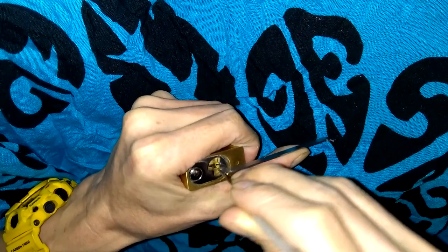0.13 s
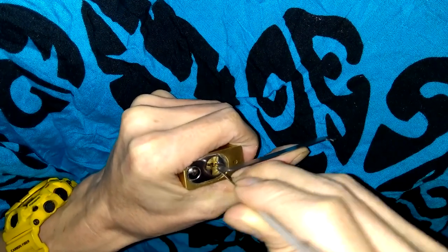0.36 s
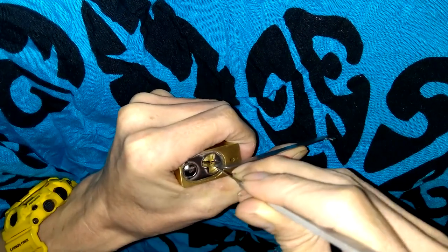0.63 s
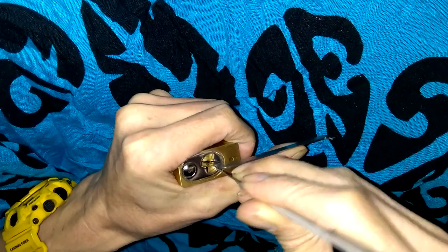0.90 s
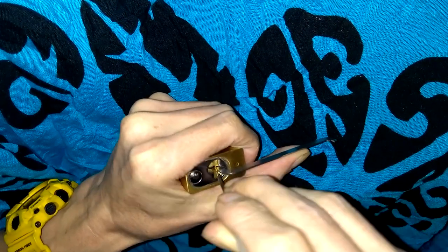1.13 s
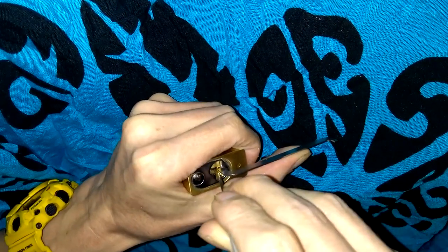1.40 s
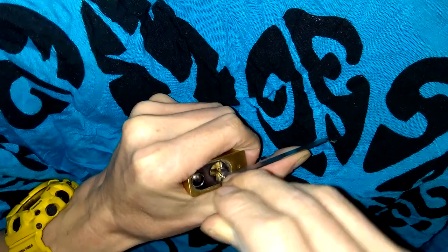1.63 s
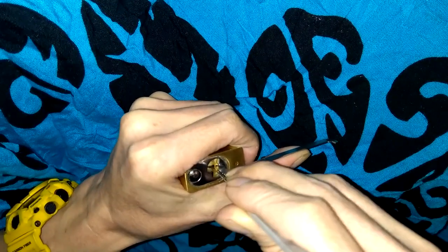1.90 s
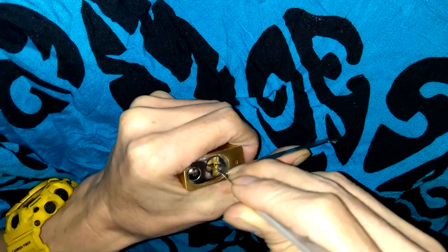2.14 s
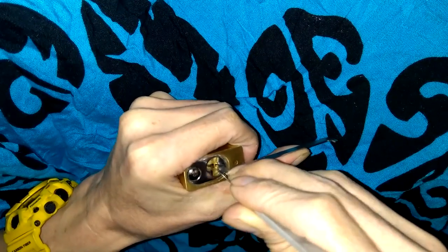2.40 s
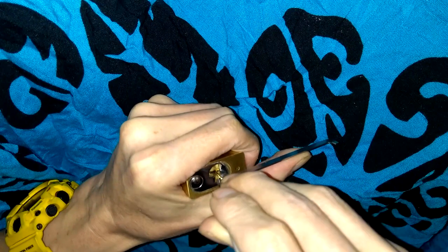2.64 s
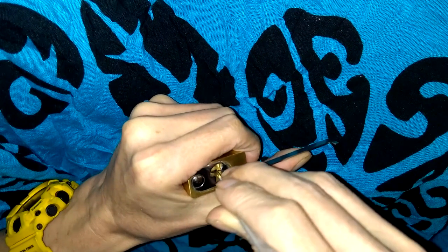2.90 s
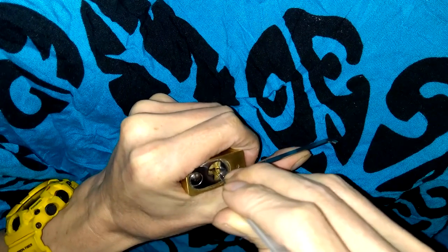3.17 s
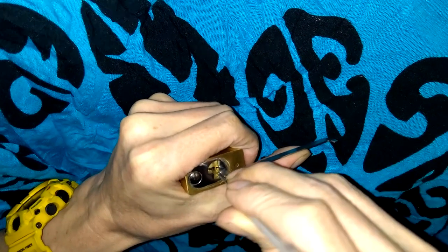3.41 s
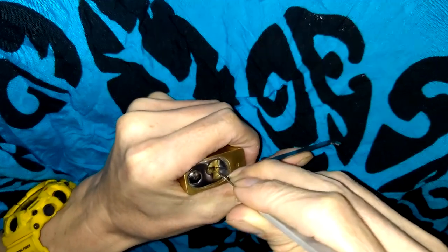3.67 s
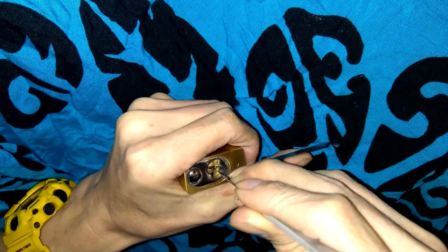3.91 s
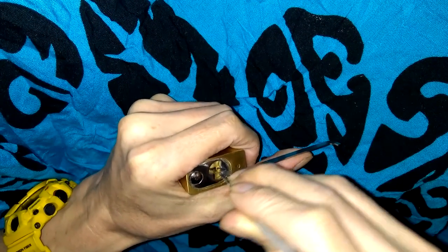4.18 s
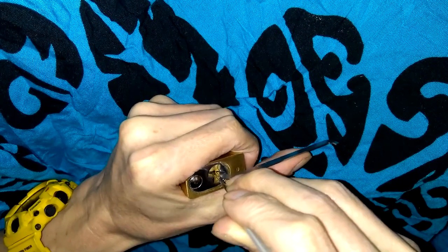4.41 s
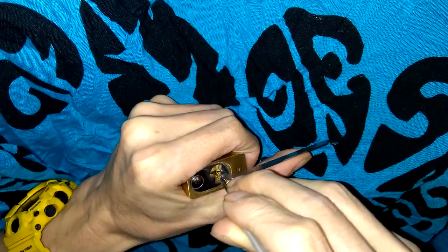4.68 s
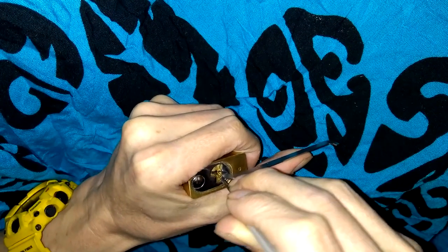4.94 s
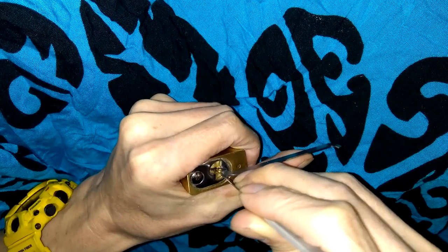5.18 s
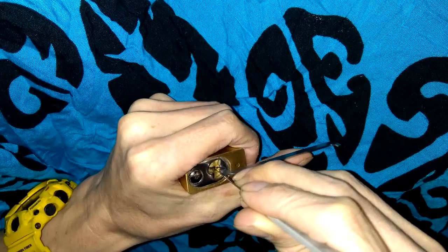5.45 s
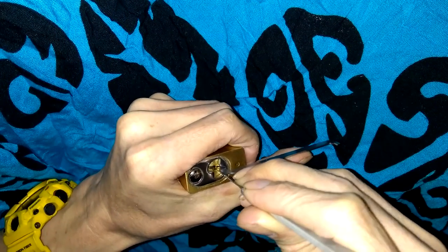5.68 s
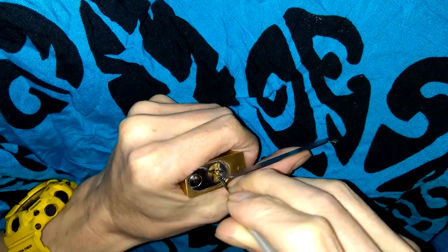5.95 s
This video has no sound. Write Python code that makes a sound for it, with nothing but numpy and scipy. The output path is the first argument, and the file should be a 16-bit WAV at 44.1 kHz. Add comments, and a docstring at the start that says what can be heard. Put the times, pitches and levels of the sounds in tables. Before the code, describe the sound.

Night insects chirr without pause, katydids rasp in uneven bursts, and a thin steel pick clicks faintly in a brass lock over distant traffic.

```python
"""A dense chorus of crickets on a warm night by a house wall: many ringing wings, each throbbing at its own pace.
A low trill pulses under them, a lone cricket sings short phrases and katydids rasp near and far in uneven clicks.
All the insects reach two microphones through one reflecting nook, built from parallel resonances and wall echoes.
Now and then a thin steel pick ticks on the pins of a brass padlock, setting short metal modes ringing.
Filtered noise makes a far insect hiss and, lowest of all, distant traffic with passing vehicles and a faint hum."""
import sys
import numpy as np
from scipy import signal
from scipy.fft import rfft, irfft
from scipy.io import wavfile
from scipy.ndimage import uniform_filter1d, map_coordinates

SR = 44100
rng = np.random.default_rng(int(sys.argv[2]) if len(sys.argv) > 2 else 0)


def wrap_up_sound(samples):
    """Save the sound to the file named by the first command line argument, as 16-bit audio."""
    columns = np.atleast_2d(samples).T
    # keep every value between -1 and 1, then stretch to whole-number steps
    tamed = np.clip(columns, -1, 1)
    steps = np.round(tamed * 32767).astype(np.int16)
    wavfile.write(sys.argv[1], SR, steps)


def field_ratio(decibels):
    """Amplitude ratio for a level in dB (20 dB per decade); scalars and array-likes work."""
    return 10 ** (np.asarray(decibels, dtype=float) / 20)


N = 267510
TIME = np.arange(N) / SR
HZ = np.maximum(np.arange(N // 2 + 1) * SR / N, 1)

# Swell of the main cricket band. Each row: time in seconds, level in dB.
CHORUS_SWELL = [(0, -34.5), (.4, -30.5), (.7, -35), (.95, -31), (1.15, -34), (1.26, -28), (1.6, -30.5),
                (2.05, -34.5), (2.45, -34.5), (3.1, -30.5), (3.35, -32.5), (3.58, -31), (3.85, -33.5),
                (4.4, -33), (5.15, -31.5), (5.65, -32.5), (5.9, -32.5), (6.07, -32)]
# Phrases of a lone cricket. Each row: start in seconds, end in seconds, level in dB.
LONE_PHRASES = [(0.26, 0.65, -49.5), (2.92, 3.27, -51.5), (5.73, 6.1, -49.5)]
# Wing strokes of the nearest katydid, in two calls.
# Each row: time in seconds, level in dB, wing ring in dB, treble in dB.
NEAR_STROKES = [(2.095, -38, -5, -5.5), (2.207, -31, 3, 0.5), (2.316, -32, 4, 3), (2.441, -31, 2, 2),
                (2.53, -51, -10, 12), (4.6, -47, -29, -28), (4.712, -34, -16, -8), (4.817, -30.5, 4, 2),
                (4.936, -28, 1.5, -1), (5.068, -28.5, 1, 1), (5.18, -48, -11, 5)]
# Calls of far katydids, each a run of even wing strokes.
# Each row: first stroke in seconds, last stroke in seconds, level in dB, offset at the first stroke in dB, treble in dB.
FAR_CALLS = [(0.047, 0.473, -40, 3, -40), (0.635, 1.306, -45, -0.5, -24), (1.436, 1.669, -33.5, -2.5, -8.5),
             (1.77, 1.987, -37.5, -5.5, -10), (2.848, 3.196, -47.5, 0, -4),
             (3.638, 4.185, -38.5, -5.5, -29), (5.45, 6.137, -40, -2, -8)]
# Colour of a wing rasp ahead of the nook. Each row: frequency in Hz, level in dB.
RASP_COLOUR = [(1300, -0.5), (1600, 1.5), (2000, -3), (2600, 4.5), (3600, 0.5), (4020, -0.5), (4300, 1),
               (5200, -4), (6300, 2.5), (8000, -2.5), (11000, -3), (13900, -2), (15100, -4), (15500, -40)]
# Resonances of the nook at each microphone.
# Each row: frequency in Hz, width in Hz, left level in dB, right level in dB, lead of the right in radians.
NOOK_RESONANCES = [(1620, 165, -15.0, -18.0, 0.91), (1980, 85, -5.5, -8.0, 1.5),
                   (2090, 60, -5.5, -7.5, -2.8), (2260, 130, -8.5, -9.5, -2.98),
                   (2465, 100, -5.0, -4.5, -2.95), (2670, 90, -7.5, -6.0, -3.1),
                   (2820, 40, -11.5, -3.0, -2.33), (2975, 70, -11.0, -19.0, -1.55),
                   (3190, 60, -7.0, 1.5, 1.72), (3340, 35, -2.5, 4.5, 0.77), (3650, 70, -2.5, 2.0, 0.49),
                   (3855, 100, -12.5, -9.5, 0.01), (4265, 210, -14.5, -12.0, 2.14),
                   (4670, 140, -12.0, -7.0, 2.7), (4935, 55, -1.0, 5.0, -2.87),
                   (5005, 55, -5.5, -9.5, -2.48), (5105, 80, 4.5, -3.5, -2.02), (5225, 150, 5.0, 8.0, 2.45),
                   (5435, 105, -4.0, 9.0, 1.74), (5535, 85, -1.0, -0.5, -0.57),
                   (5745, 570, -2.0, -5.0, -0.37), (5765, 65, -2.0, -1.0, 0.69),
                   (5895, 130, -17.0, -7.0, -0.46), (6060, 560, -1.5, -2.0, -0.22),
                   (6260, 230, -4.5, 0.0, 0.26), (6440, 65, -13.0, -4.5, 0.77),
                   (6700, 170, -16.0, -10.0, 2.59), (7800, 355, -22.5, -22.5, -2.06),
                   (8470, 1500, -24.5, -36.0, 0.51), (9510, 735, -21.0, -31.0, -2.52),
                   (10615, 780, -19.5, -27.0, -1.76), (11010, 370, -26.0, -21.0, 1.37),
                   (12790, 365, -44.0, -42.0, -0.68), (14515, 915, -45.0, -35.5, -0.75)]
# Cancelling reflections at both microphones. Each row: frequency in Hz, width in Hz, depth from 0 to 1.
SHARED_DIPS = [(2025, 40, .4), (2175, 40, .3), (2360, 60, .8), (2590, 80, .9), (3480, 70, .5),
               (3566, 480, 0.3), (7250, 360, 0.8)]
# Cancellations at the left microphone only. Each row: frequency in Hz, width in Hz, depth from 0 to 1.
LEFT_DIPS = [(2830, 104, 0.53), (3120, 60, 0.65), (4430, 80, 1), (4440, 40, 0.1), (5350, 50, 0.2),
             (6800, 67, 0.6), (6500, 67, 0.9)]
# Cancellations at the right microphone only. Each row: frequency in Hz, width in Hz, depth from 0 to 1.
RIGHT_DIPS = [(2089, 40, 0.49), (3080, 144, 0.37), (4500, 60, 0.55), (5260, 49, 0.6), (6440, 50, .3)]
# Nook resonances that far callers barely excite. Each row: frequency in Hz, width in Hz, depth from 0 to 1.
FAR_DIPS = [(3160, 130, 0.86), (3683, 380, 0.57)]
# Colour of the echoes against the direct sound. Each row: frequency in Hz, level in dB.
ECHO_COLOUR = [(1500, 5), (1800, 0), (1900, -1), (2400, 0), (2720, -6), (2830, 6), (3100, -1), (3200, 7),
               (4100, 6), (4500, -0.5), (4800, 17), (4900, -8.5), (6400, -6), (6700, 4)]
# Ticks of the pick on the pins. Each row: time in seconds, level in dB, ring time to -60 dB in seconds.
PICK_TICKS = [(0.814, -65, 0.025), (1.513, -44, 0.0072), (1.9852, -29, 0.0083), (3.0794, -58, 0.009),
              (3.256, -58, 0.0063), (3.3194, -58, 0.009), (5.9, -51, 0.007)]
# Modes of pin and lock. Each row: frequency in Hz, level in dB, share of the tick's ring time.
LOCK_MODES = [(1460, -5, 1.5), (2250, -16, 1.2), (3170, -6, 1.2), (4540, -7, 1.0), (8800, -14, 0.8),
              (10200, -2, 1.1), (11100, -2, 1.1), (12000, -9, 0.6), (14200, -1, 0.6), (15000, -8, .5)]
# Colour of the far insect hiss ahead of the nook. Each row: frequency in Hz, level in dB per Hz.
HISS_COLOUR = [(1400, -3), (2400, -5.5), (2800, -6.5), (3500, -18.5), (3750, -15), (4020, -4), (4250, -9),
               (4500, -4), (5200, -17.5), (6600, -37), (7200, -18.5), (8500, -6), (10500, -8),
               (12000, -8.5), (13900, -5.5), (14600, 0), (15100, 3), (15400, -30)]
# Colour of the traffic rumble. Each row: frequency in Hz, level in dB per Hz.
RUMBLE_COLOUR = [(25, -18), (50, -10.5), (90, 0), (160, 1.5), (300, -7.5), (500, -23.5), (680, -17.5),
                 (900, -11.5), (1030, -20), (1220, -20), (1420, -20), (1700, -21.5)]
# Stereo image of the traffic. Each row: frequency in Hz, lead of the right in radians, likeness from 0 to 1.
TRAFFIC_STEREO = [(30, 3.1, .98), (150, 2.9, .93), (300, 2.45, .82), (550, 1.2, .5), (850, -.4, .78),
                  (1100, 0, .98), (1600, .5, .92)]
# Far vehicles passing. Each row: nearest moment in seconds, half width in seconds, rumble in dB, tyre wash in dB.
PASSES = [(1.0, 0.33, -54.5, -55), (2.42, 0.16, -53, -60.5), (5.75, 0.38, -49, -66)]


def rms_one(x):
    """Scale to unit rms."""
    return x / np.sqrt(np.mean(x ** 2) + 1e-20)


def in_time(rows):
    """Each column as a value per sample."""
    s, *columns = np.transpose(rows)
    return [np.interp(TIME, s, c) for c in columns]


def over_hz(rows):
    """Each column as a value per frequency bin, drawn over log frequency."""
    hz, *columns = np.transpose(rows)
    return [np.interp(np.log(HZ), np.log(hz), c) for c in columns]


def drift(rate):
    """Slow random wander with a spread of about 1, through 2 * rate random points a second."""
    knots = rng.standard_normal(600)
    return map_coordinates(knots, [TIME * 2 * rate], order=3)


def step(at_s, span_s):
    """A smooth change from 0 to 1 around a moment."""
    return .5 + .5 * np.tanh((TIME - at_s) / span_s)


def band(low_hz, high_hz, steep):
    """A flat band with steep flanks."""
    return 1 / np.sqrt((1 + (low_hz / HZ) ** steep) * (1 + (HZ / high_hz) ** steep))


def dips(rows):
    """Narrow cancellations multiplied together."""
    notches = [1 - np.clip(depth, 0, 1) / (1 + 2j * (HZ - hz) / width) for hz, width, depth in rows]
    return np.prod(notches, axis=0)


def ring(clicks, hz, t60):
    """A two-pole resonator: a unit click sets a sine of height 1 ringing down by 60 dB in t60 seconds."""
    r, w = field_ratio(-60 / (t60 * SR)), 2 * np.pi * hz / SR
    return signal.lfilter([0, np.sin(w)], [1, -2 * r * np.cos(w), r * r], clicks + 1e-18)


def nook():
    """Parallel resonances of alternating sign, each reaching the two microphones differently, plus wall echoes."""
    ears = np.zeros((2, len(HZ)), complex)
    for k, (hz, width, left_db, right_db, lead) in enumerate(NOOK_RESONANCES):
        shape = (-1) ** k / (1 + 1j * (HZ / hz - hz / HZ) * hz / width)
        ears += shape * [[field_ratio(left_db)], [field_ratio(right_db) * np.exp(1j * lead)]]
    ears *= dips(SHARED_DIPS) * [dips(LEFT_DIPS), dips(RIGHT_DIPS)]
    wall_delay_s = [[[0.0088], [0.002]], [[0.0055], [0.0046]]]   # two walls, each left then right
    echo = field_ratio(-3.5) * np.exp(-2j * np.pi * HZ * wall_delay_s).sum(0)
    return ears * (1 + echo * band(7540, 18000, steep=20.0))   # hard walls ripple the treble


def arrive(sources, ears, diffuse, colour=1):
    """The first source comes from one side; the other two stand for echoes that differ at each microphone."""
    share = np.clip(diffuse, 0, 1)
    blur_hz = 150   # echoes come from all sides, so the nook's notches blur for them
    blurred = np.sqrt(uniform_filter1d(np.abs(ears) ** 2, size=round(blur_hz * N / SR)) + 1e-20)
    blurred = blurred * field_ratio(over_hz(ECHO_COLOUR)[0])
    direct, *echoes = rfft(sources)
    direct_part = np.sqrt(1 - share) * direct * ears
    echo_part = np.sqrt(share) * np.array(echoes) * blurred
    return rms_one(irfft((direct_part + echo_part) * colour, N))


def wing_pulses(low_hz, high_hz, per_s, t60, throb_hz, throb_db, count):
    """Random tooth strikes ring wings of spread pitch, each singer throbbing and swelling at its own pace."""
    out = np.zeros((3, N))
    for hz in np.linspace(low_hz, high_hz, count):
        pace_hz = throb_hz * rng.uniform(0.96, 1.03)
        beat = 2 * np.pi * (pace_hz * TIME + rng.random() + 0.39 * drift(1.547))
        strikes = (rng.random((3, N)) < per_s / SR) * rng.standard_normal((3, N))
        swell = field_ratio(throb_db * np.sin(beat) + 1.9 * drift(3.3))
        out += ring(ring(strikes * swell, hz, t60), hz, t60)   # ringing twice softens the attack
    return out


def steady_pulses(per_s, waver, uneven_db):
    """One singer's regular wing strokes, the pace wandering a little; three staggered paths."""
    cycles = np.cumsum(per_s * (1 + waver * drift(2.3))) / SR + rng.random((3, 1))
    strokes = np.diff(np.floor(cycles), prepend=np.floor(cycles[:, :1]))
    return strokes * field_ratio(uneven_db * rng.standard_normal((3, N)))


def crickets(ears):
    """Two bands of throbbing singers; squaring the main one gives it a faint octave overtone."""
    main_db, = in_time(CHORUS_SWELL)
    upper_db = -43 - 2 * (1 - step(0.83, .05)) + 1.0 * drift(2.425)   # the upper band comes up after a moment
    main = wing_pulses(4866, 5627, per_s=1500, t60=0.011, throb_hz=26.4, throb_db=1.5, count=5)
    overtone = main ** 2 - uniform_filter1d(main ** 2, size=17)
    upper = wing_pulses(5660, 6550, per_s=1900, t60=0.003, throb_hz=48.6, throb_db=-1.0, count=5)
    main_heard = arrive(main, ears, 0.038, colour=band(4840, 7800, steep=110.0))
    overtone_heard = arrive(overtone, ears, 0.45, colour=band(10540, 10540, steep=124.0))
    upper_heard = arrive(upper, ears, 0.057, colour=band(5610, 7080, steep=290.0))
    return (field_ratio(main_db + 0.71 * drift(9.2)) * main_heard
            + field_ratio(main_db - 29.5 + 0.85 * drift(5.4)) * overtone_heard
            + field_ratio(upper_db + 1.46 * drift(10)) * upper_heard)


def lead_cricket(ears):
    """The nearest singer, to the right: regular wing strokes ring near 5.3 kHz, swelling slowly."""
    strokes = steady_pulses(26.2, waver=.013, uneven_db=1.0)
    song = ring(ring(strokes, 5325, t60=0.07), 5325, t60=0.07)
    left_right = field_ratio([[-6], [1]])
    return field_ratio(-38 + 2.5 * drift(1.8)) * arrive(song, ears, 0) * left_right


def low_trill(ears):
    """Deep singers near 2 kHz pulse about 53 times a second, one clear and regular, with a weaker flank above."""
    trill = wing_pulses(1990, 2064, per_s=2500, t60=0.014, throb_hz=53.9, throb_db=5.5, count=3)
    strokes = steady_pulses(52.9, waver=.004, uneven_db=2.5)
    soloist = ring(ring(strokes, 2010, t60=.02), 2010, t60=.02)
    flank = wing_pulses(2319, 2370, per_s=490, t60=0.031, throb_hz=51.8, throb_db=6.0, count=2)
    level_db = -43.5 - 2.5 * step(4.27, 0.052) + 1.0 * drift(8.7)   # weaker for the last stretch
    solo = field_ratio(level_db - 6 + 3 * drift(5)) * arrive(soloist, ears, .05)
    return field_ratio(level_db - 1.5) * arrive(trill, ears, 0.08) + solo + field_ratio(level_db - 8.5) * arrive(flank, ears, 0.05)


def lone_cricket(ears):
    """One song near 4.4 kHz, gated into short phrases of soft, run-together pulses."""
    song = wing_pulses(4385, 4405, per_s=3000, t60=0.045, throb_hz=25, throb_db=3.0, count=2)
    edge_s = .07
    gate = 0
    for start, end, level_db in LONE_PHRASES:
        gate = gate + field_ratio(level_db) * np.clip(np.minimum(TIME - start, end - TIME) / edge_s, 0, 1)
    return gate * field_ratio(1.5 * drift(3.6)) * arrive(song, ears, 0.3)


def rasp(strokes, ears, stroke_s, garden, rough_db):
    """A file of teeth dragged over the wing edge: dense uneven clicks swelling and fading with each stroke."""
    power = np.zeros((3, N))     # body, wing ring near 3.6 kHz, treble
    for s, level_db, ring_db, treble_db in strokes:
        swell = field_ratio(2 * level_db) * np.cos(np.pi * np.clip((TIME - s) / stroke_s, -.5, .5)) ** 2
        power += swell * field_ratio([[0], [2 * ring_db], [2 * treble_db]])
    fade = field_ratio(-120 / (.45 * SR))     # garden echoes, 60 dB down in 0.45 s, fill the gaps between strokes
    power = power + garden * signal.lfilter([1 - fade], [1, -fade], power)
    teeth_per_s = 3500 * field_ratio(rough_db * drift(25))
    teeth = (rng.random((3, N)) < teeth_per_s / SR) * rng.standard_normal((3, N))
    sound = rfft(arrive(teeth, ears, 0.06, colour=field_ratio(over_hz(RASP_COLOUR)[0])))
    below_ring, below_treble = 1 / (1 + (HZ / 3480) ** 20), 1 / (1 + (HZ / 4900) ** 14)
    parts = below_ring, below_treble - below_ring, 1 - below_treble
    return sum(np.sqrt(p) * irfft(sound * part, N) for p, part in zip(power, parts))


def katydids(ears):
    """One near caller; far ones ease from their opening level, then tire, and reach the nook from another side."""
    stroke_gap_s, fresh_s, sag_db_per_s, far_ring_db = .115, .34, 28, -2.5
    far = []
    for first, last, call_db, first_db, treble_db in FAR_CALLS:
        for s in np.linspace(first, last, 1 + round((last - first) / stroke_gap_s)):
            opening_db = first_db * max(1 - (s - first) / fresh_s, 0)
            sag_db = sag_db_per_s * max(s - first - fresh_s, 0)
            far.append((s, call_db + opening_db - sag_db, far_ring_db, treble_db))
    return (rasp(NEAR_STROKES, ears, stroke_s=.148, garden=.32, rough_db=2.0)
            + rasp(far, ears * dips(FAR_DIPS), stroke_s=0.13, garden=0.69, rough_db=1.5))


def pick():
    """Each tick is a strike and quick rebounds into the short modes of pin and lock; the right side hears it later."""
    out = np.zeros((2, N))
    for s, level_db, t60 in PICK_TICKS:
        at, span = round(s * SR), 2000
        clicks = np.zeros(span)
        click_db = [8.5, -10, 3, -4, -2, -8, -14]
        clicks[[35, 55, 120, 160, 230, 290, 350]] = field_ratio(click_db) * rng.choice([-1, 1], 7)   # offsets in samples
        out[:, at:at + span] += field_ratio(level_db - 10.0) * clicks[:N - at]     # the dry crack of contact
        for hz, mode_db, share in LOCK_MODES:
            strength = field_ratio(level_db + mode_db - 6 + rng.normal(0, 2.5, (2, 1))) * rng.choice([-1, 1])
            out[:, at:at + span] += (strength * ring(clicks, hz, t60 * share))[:, :N - at]
    out[1] = np.roll(out[1], 19)   # in samples
    return irfft(rfft(out) * band(900, 17000, steep=40.0), N)


def far_insects(ears):
    """The distant chorus blurs into a flickering hiss: coloured noise through the nook."""
    colour = field_ratio(over_hz(HISS_COLOUR)[0]) * (HZ < 15800)
    hiss = arrive(rng.standard_normal((3, N)), ears, .05, colour=colour)
    return field_ratio(-50.5 + 2.0 * drift(4.8)) * hiss


def traffic():
    """Far rumble, nearly opposite at the two microphones in the bass, tyre wash as vehicles pass and a wavering hum."""
    rumble_power, wash_power = field_ratio(2 * -50.5), field_ratio(2 * -65.5)
    for s, half, low_db, tyre_db in PASSES:
        nearness = 1 / (1 + ((TIME - s) / half) ** 2) ** 2
        rumble_power = rumble_power + field_ratio(2 * low_db) * nearness
        wash_power = wash_power + field_ratio(2 * tyre_db) * nearness
    lead, alike = over_hz(TRAFFIC_STEREO)
    alike = np.clip(alike, 0, 1)
    shared, *own = rfft(rng.standard_normal((3, N)))
    pair = np.sqrt(alike) * shared * [np.ones_like(lead), np.exp(1j * lead)] + np.sqrt(1 - alike) * np.array(own)
    pair = pair * field_ratio([[-.6], [.6]])
    rumble, colour = 0, field_ratio(over_hz(RUMBLE_COLOUR)[0]) * band(20, 2050, steep=27.0)
    for low, high in zip([1, 90, 180, 350, 700], [90, 180, 350, 700, 4000]):   # each band wavers alone
        rumble = rumble + field_ratio(1.56 * drift(6)) * irfft(pair * colour * (HZ >= low) * (HZ < high), N)
    scattered = pair * np.exp(2j * np.pi * rng.random(len(HZ)))   # fresh phases part the wash from the rumble
    wash = irfft(scattered / (1 + ((HZ - 420) / 220) ** 4), N)
    hum = field_ratio(-73 + 3.5 * drift(4)) * np.sin(2 * np.pi * 241.4 * TIME + 1.5 * drift(3))
    build_db = 4.5 * (step(0.36, 0.24) - 1)   # the road fills at first
    ebb_db = -3.5 * step(5.02, 0.13)   # and thins out late
    road = np.sqrt(rumble_power) * field_ratio(build_db + ebb_db) * rms_one(rumble)
    return road + np.sqrt(wash_power) * rms_one(wash) + hum


def scene():
    """All sources summed at the two microphones."""
    ears = nook()
    singers = crickets(ears) + lead_cricket(ears) + low_trill(ears) + lone_cricket(ears) + far_insects(ears)
    return singers + katydids(ears) + pick() + traffic()


def top_cut(x):
    """Nothing passes above the cut-off."""
    return signal.sosfilt(signal.butter(12, 15850, fs=SR, output="sos"), x)


def record(dry):
    """A steep low-pass at 15.75 kHz cuts the top of the mix."""
    mix = irfft(rfft(dry) * band(1, 15750, steep=200), N)
    return top_cut(mix)


dry = scene()
out = record(dry)
wrap_up_sound(out)
```